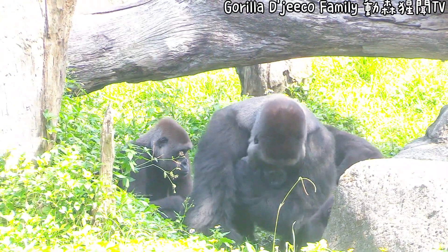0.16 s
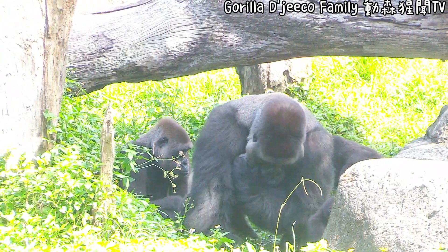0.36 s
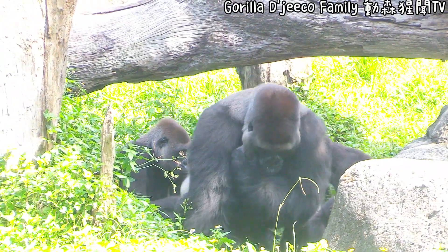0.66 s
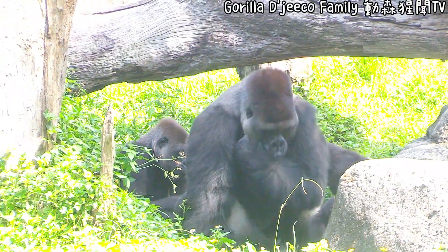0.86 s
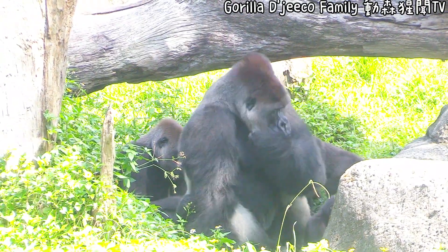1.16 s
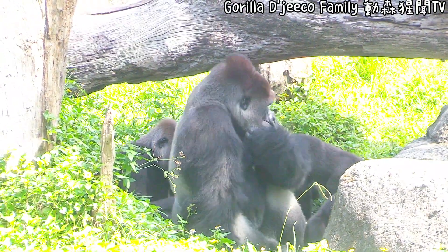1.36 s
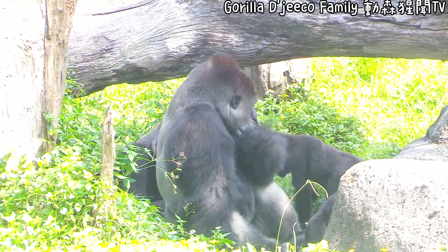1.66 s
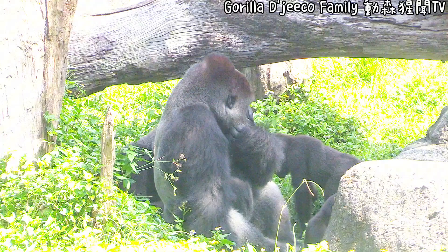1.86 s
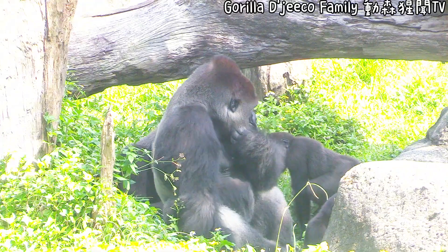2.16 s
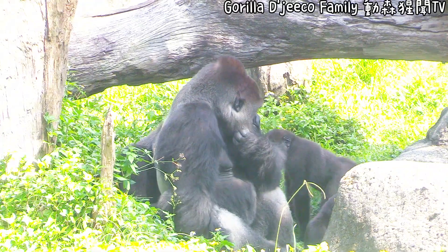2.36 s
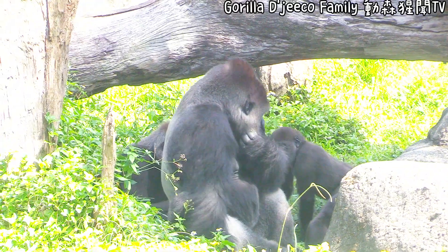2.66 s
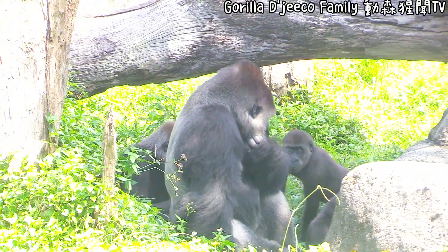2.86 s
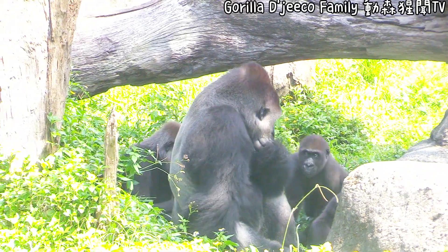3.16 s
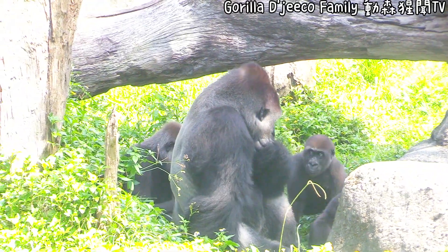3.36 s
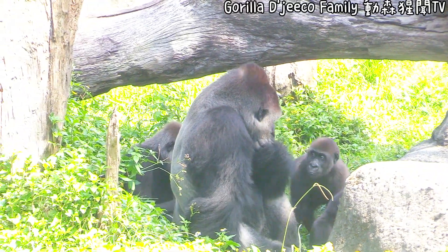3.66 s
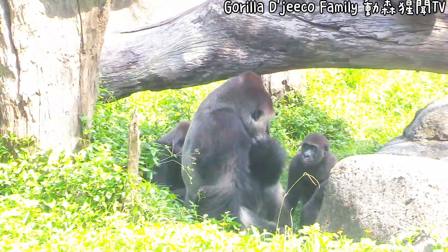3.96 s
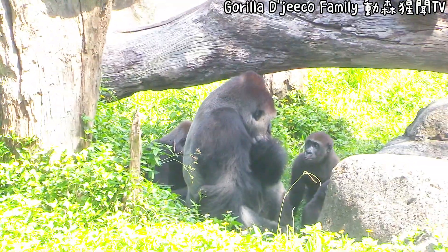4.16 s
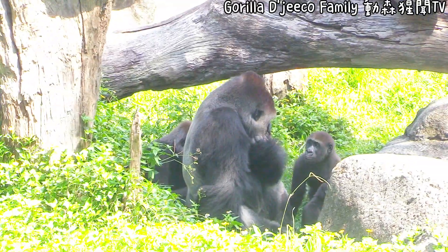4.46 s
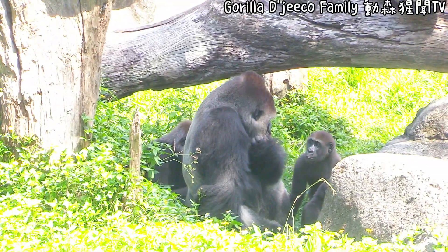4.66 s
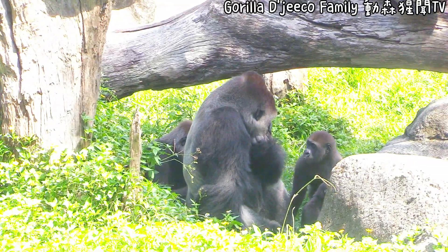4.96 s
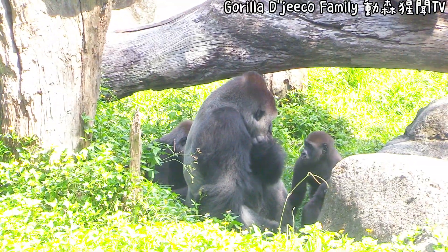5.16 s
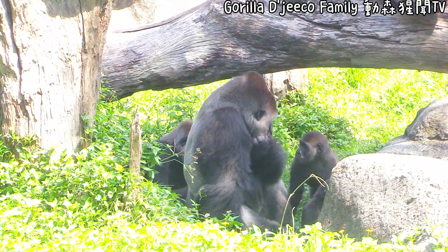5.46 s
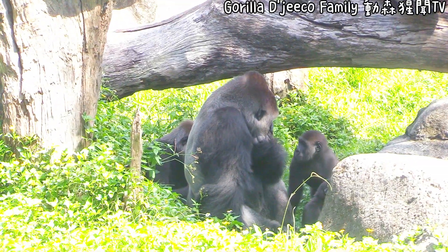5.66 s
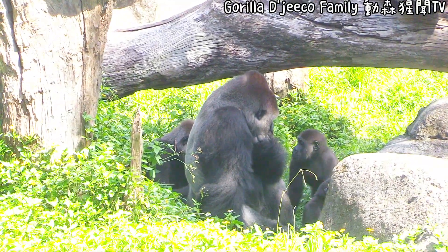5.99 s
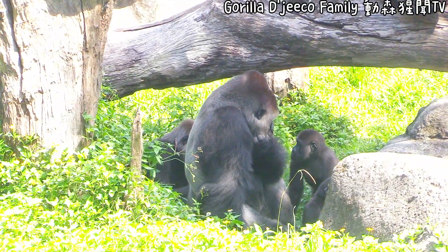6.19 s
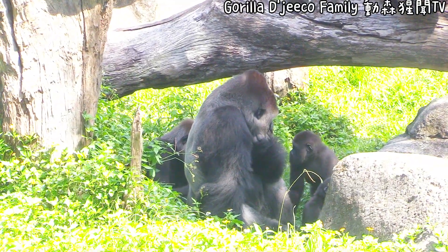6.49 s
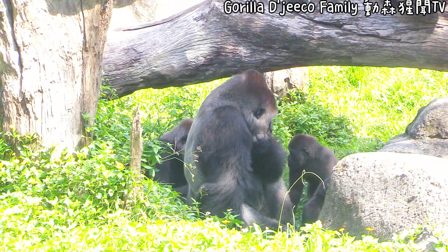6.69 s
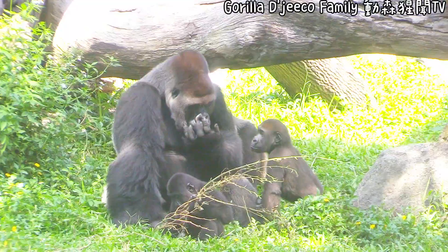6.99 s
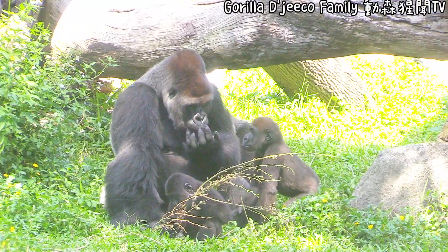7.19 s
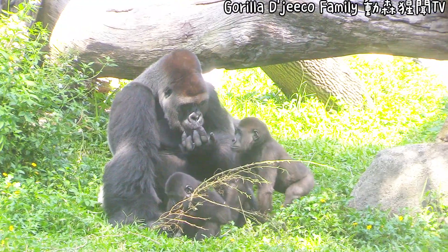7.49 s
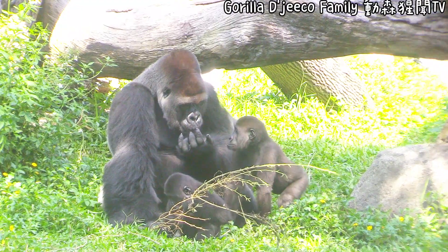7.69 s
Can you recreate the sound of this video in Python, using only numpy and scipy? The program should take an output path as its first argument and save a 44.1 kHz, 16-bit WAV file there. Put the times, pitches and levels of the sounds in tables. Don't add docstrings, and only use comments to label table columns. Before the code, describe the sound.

A low engine drone under a broad outdoor rush, with light handling ticks and two plastic knocks, then a sudden cut to a quieter spot with cicada and bird.

```python
import sys
import numpy as np
from scipy import signal
from scipy.fft import rfft, irfft, next_fast_len
from scipy.io import wavfile
from scipy.ndimage import uniform_filter1d

SR = 44100
rng = np.random.default_rng(int(sys.argv[2]) if len(sys.argv) > 2 else 0)


def volts(x):
    e = np.asarray(x, float) / 20
    return 10 ** e


def generate_wav(signal):
    frames = np.transpose(np.atleast_2d(signal))
    scaled = np.clip(frames, -1, 1) * 32767
    pcm = np.round(scaled).astype(np.int16)
    wavfile.write(sys.argv[1], SR, pcm)


N = 345289
CUT_S = 6.7625


def unit(x):
    return x / np.sqrt(np.mean(x ** 2) + 1e-20)


def along(points, hz):
    point_hz, value = np.transpose(points)
    return np.interp(np.log(hz + 1), np.log(point_hz + 1), value)


def curves(rows):
    time_s, *columns = np.transpose(rows)
    return [np.interp(np.arange(N) / SR, time_s, column) for column in columns]


def wobble(rate):
    points = int(N * rate / SR) + 4
    return np.interp(np.arange(N) * rate / SR, np.arange(points), rng.standard_normal(points))


def filtered(x, response):
    m = next_fast_len(N + 8192)
    return irfft(rfft(x, m) * response(np.fft.rfftfreq(m, 1 / SR)), m)[..., :N]


# pitch_hz, side_minus_mid_db
PORTS = [(60, -20), (95, -7), (150, -19), (240, -14), (380, -5), (600, -2), (950, 1.5), (1500, -2),
         (2380, -9), (3770, 4), (5980, -2.5), (9470, -7.5), (15000, -6)]
# pitch_hz, left_minus_right_db
LEAN = [(300, 0.5), (1000, 1), (3000, 1.3), (10000, 1.3)]


def diffuse(gain, patchy_db):
    cells = signal.stft(rng.standard_normal((2, N)), nperseg=512)[2]
    patches = uniform_filter1d(rng.standard_normal(cells.shape[1:]), 5, 0)
    patches = unit(uniform_filter1d(patches, 12, 1))
    pair = signal.istft(cells * volts(patchy_db * patches), nperseg=512)[1][:, :N]
    mid, side = filtered(pair, lambda hz: gain(hz) * [hz >= 0, volts(along([(30, 1)] + PORTS, hz))])
    ports = np.array([mid + side, mid - side]) / np.std(mid)
    return filtered(ports, lambda hz: volts(np.outer([.5, -.5], along(LEAN, hz))))


# time_s, shift_db
SWAY = [(0, 4), (1.2, 0.3), (2.8, -1.5), (4.2, 0.7), (5.6, -0.3), (6.8, -3.5)]


def engine(orders, unsteady_db, drift, flutter_hz):
    shaft_hz = 28.7391
    shaft = 2 * np.pi * shaft_hz * np.arange(N) / SR - 1.452
    ninth_db, = curves(SWAY)
    build_db = -np.cos(2 * np.pi * np.arange(N) / SR / 7.9)
    sixth_db = build_db - 0.13 * ninth_db
    upper_db = build_db + 0.15 * ninth_db
    out = np.zeros((2, N))
    for order, db, pan_db, lead in orders:
        weak = np.clip((order - 6) / 12, 0, 1)
        path_db = sixth_db if order == 6 else ninth_db if order == 9 else upper_db * weak
        flutter_db = unsteady_db * (0.35 + 1.67 * weak) * wobble(flutter_hz)
        level = np.sqrt(2) * volts(db + drift * path_db + flutter_db)
        phase = order * shaft + np.pi - 1.65 * np.log(order / 3)
        phase += (order > 9) * rng.uniform(0, 2 * np.pi)
        alike = level * np.cos(lead / 2) * np.cos(phase)
        apart = level * np.sin(lead / 2) * np.sin(phase)
        out[0] += volts(pan_db / 2) * (alike - apart)
        out[1] += volts(-pan_db / 2) * (alike + apart)
    return out


def weak_orders(strong):
    firing_order, last_order, knee_order = 1.5, 30, 21
    firing = np.arange(3, last_order / firing_order) * firing_order
    whole = np.setdiff1d(np.arange(13, last_order, 4), firing)
    order = np.setdiff1d(np.union1d(firing, whole), [row[0] for row in strong])
    db = -63.8 - 6.5 * (order > knee_order) - 4 * np.isin(order, whole)
    chance = rng.standard_normal((len(order), 2))
    pan_db, lead_rad = 0.5 * chance[:, 0], 1 * chance[:, 1]
    return list(zip(order, db, pan_db, lead_rad))


# shaft_multiple, level_db (rms), left_minus_right_db, left_lead_rad
ORDERS_NEAR = [(3, -47, 0, 0.1), (5, -50, 2, 0.1), (6, -41, -2, 0.1), (7, -62, 1, 0.3), (9, -45, 0, -0.1),
               (11, -60, -2, 0.3), (12, -61, -4, -1.1), (15, -56, 0, 0.7), (16, -63, 9, 1.1),
               (21, -65, -2, 0.5), (25.5, -65, 8, 1.2), (30, -66, -5, -0.3), (48, -68, 6, -0.3),
               (69, -68, 2, 0.0)]


def near_engine():
    return engine(ORDERS_NEAR + weak_orders(ORDERS_NEAR), 0.86, 0.6, 1.496)


# pitch_hz, level_db (per Hz)
ROAR_NEAR = [(18, -62), (30, -28), (62, -15), (110, -7), (220, -8.5), (480, -10), (620, -12.5), (900, -14),
             (2700, -15.5), (3400, -24), (4400, -28.5), (6400, -26), (9000, -27.5), (13000, -28.5),
             (15800, -36)]
ROAR_FAR = [(18, -54), (30, -26), (70, -15), (130, -7), (447, -7), (600, -13.5), (1150, -15), (1300, -16.5),
            (2700, -17), (3540, -26), (7700, -26.5), (9200, -24.5), (10200, -30.5), (13000, -29.5),
            (15800, -40)]


def roar(spectrum, level_db, patchy_db):
    noise = diffuse(lambda hz: volts(along(spectrum, hz)), patchy_db)
    return volts(level_db + 0.18 * wobble(3.315)) * noise


# pitch_hz, level_db, t60_s (time to fade by 60 dB)
PANELS = [(735, 2, 0.013), (1144, -3.5, 0.027), (1600, 8, 0.007), (2150, 2.5, 0.018), (2420, -1, 0.031),
          (3100, 1.5, 0.017), (3600, 6, 0.012), (4500, -1.5, 0.009), (5400, 6, 0.011), (7300, -3, .01)]
# start_s, peak_db, centre_hz (of panels touched), reach_octaves, lean_left (-1 to 1)
TICKS = [(1.052, -35.5, 2630, 0.53, .1), (1.0532, -43, 5400, .12, 0.01), (1.0966, -43, 3600, .15, 0.01),
         (1.1167, -32, 2900, 0.56, -.5), (1.1180, -36, 1300, .6, -.4), (1.205, -49, 3300, .15, .3),
         (1.8603, -37, 7300, .15, .6), (2.7862, -44, 3100, .15, .4), (4.0350, -37, 1100, .5, -.5),
         (4.0537, -39.5, 1500, 0.54, -.2), (4.0610, -44, 1600, .15, .1), (4.0530, -50, 3500, .12, 0.01),
         (4.3676, -39.5, 2950, 0.26, .6), (5.1491, -29, 1600, 1.2, .4), (5.1494, -31.5, 3660, .3, .4),
         (5.2897, -42, 2100, .12, 0.01), (5.9485, -52, 3600, .12, 0.01), (5.9816, -25.5, 2150, .14, -0.6),
         (5.982, -39, 4300, .12, -.4)]


def ticks():
    out, t = np.zeros((2, N + SR)), np.arange(SR // 30) / SR
    hz, level_db, t60 = np.transpose(PANELS)[:, :, None, None]
    share = np.array([[.35], [.75], [.35]]) * (-1) ** np.arange(len(hz))[:, None, None]
    for s, db, centre_hz, reach, lean in TICKS:
        split = 1 + .06 * np.array([[-1], [0], [1]]) * rng.uniform(.6, 1.4, (len(hz), 3, 1))
        start = rng.normal(0, 1.3, (len(hz), 3, 1))
        turn = np.arccos(np.clip(lean, -1, 1))
        touched_db = db + level_db - 6 * (np.log2(hz / centre_hz) / reach) ** 4
        fade = share * volts(touched_db - 60 * t / t60) * (1 - np.exp(-t / 0.000055))
        phase = 2 * np.pi * hz * split * t + start
        mid = volts(-1.0) * (fade * np.sin(phase)).sum((0, 1))
        side = volts(-3.5) * (fade * np.sin(phase + turn)).sum((0, 1))
        out[:, round(s * SR):][:, :len(t)] += [mid + side, mid - side]
    return out[:, :N]


# start_s, peak_db, t60_s, left_minus_right_db
SNAPS = [(1.0521, -40, .006, 1), (1.1158, -33, .008, -3), (2.7862, -42, .003, 2), (4.3676, -42, .004, 3),
         (5.1490, -25, .0012, 3), (5.9819, -42, .004, -3)]


def snaps():
    out, t = np.zeros((2, N + SR)), np.arange(512) / SR
    for s, db, t60, pan_db in SNAPS:
        common, own = rng.standard_normal(len(t)), rng.standard_normal((2, len(t)))
        common[0] = 5.3
        crack = np.diff((common + 0.16 * own) * volts(-60 * t / t60), prepend=0)
        level = .55 * volts(db + np.array([[pan_db / 2], [-pan_db / 2]]))
        out[:, round(s * SR):][:, :len(t)] += level * crack

    def housing(hz):
        echo = 1 - .9 * np.exp(-2j * np.pi * hz / 4750)
        return echo * (hz > 4300) * 7000 / (hz + 1)
    return filtered(out[:, :N], housing)


# pitch_hz, level_db, t60_s
SHELL = [(721, -27, .06), (940, -19.5, .15), (1244, -22, .07), (1620, -22, .03), (2040, -15, .028),
         (2450, -13, .022), (2900, -13, .022), (3480, -1, .010), (3900, -12, .008), (5100, -21, .008),
         (6300, -22, .008)]
# start_s, peak_db, pitch_factor, deep_db (extra for tones under 3 kHz)
KNOCKS = [
    (1.1434, -13, 1, 0),
    (5.8906, -24.5, .985, 5),
]


def knocks():
    out, t = np.zeros((2, N + SR)), np.arange(SR // 5) / SR
    for s, db, pitch, deep_db in KNOCKS:
        ring = np.zeros((2, len(t)))
        for k, (hz, level_db, t60) in enumerate(SHELL):
            fade = (-1) ** k * volts(level_db + deep_db * (hz < 3000) - 60 * t / t60)
            start = 0.12 * rng.standard_normal((2, 1))
            ring += fade * np.sin(2 * np.pi * hz * pitch * t + start)
        rattle = signal.lfilter([1], [1, -1.3, .6], rng.standard_normal((2, len(t))))
        rattle *= volts(-32.0 - 60 * t / 0.035)
        crack = volts(-19 - 60 * t / 0.007) * rng.standard_normal(len(t))
        onset = 1 - np.exp(-t / .00015)
        out[:, round(s * SR):][:, :len(t)] += volts(db) * (ring + rattle + crack) * onset
    return out[:, :N]


# shaft_multiple, level_db (rms), left_minus_right_db, left_lead_rad
ORDERS_FAR = [(3, -70, 0, .1), (6, -56, -1, .2), (9, -64, -1, .3), (15, -71, 0, .7)]


def far_engine():
    return engine(ORDERS_FAR, 4, 0, 14)


# pitch_hz, width_hz, level_db, pulsing_share (0 to 1), lag_rad (of the stroke)
TYMBAL = [(7000, 550, 0, 1, 0), (6350, 500, -2.5, .5, .8), (5250, 450, -6, .5, 1.7)]


def cicada():
    tires_s, stroke_hz = 7.44, 16.5
    depth = np.where(np.arange(N) / SR < tires_s, .8, .55)
    stroke = 2 * np.pi * stroke_hz * np.arange(N) / SR + 3.25
    out = np.zeros((2, N))
    for hz, width_hz, db, share, lag in TYMBAL:
        swell = 1 + np.clip(depth * share, 0, 1) * np.cos(stroke - lag)
        out += volts(db) * swell * diffuse(lambda f: np.exp(-2 * ((f - hz) / width_hz) ** 2), .5)
    return volts(-66.3) * out


# start_s, pitch_hz (at the start), level_db
NOTES = [(7.2, 2750, -64), (7.297, 2780, -65), (7.385, 2030, -59.5), (7.420, 2300, -62), (7.454, 2680, -52),
         (7.485, 2950, -63)]


def bird():
    note_s, rise_hz_per_s = .045, 6500
    whistle = np.zeros(N)
    for s, from_hz, db in NOTES:
        u = np.linspace(0, 1, round(note_s * SR))
        phase = 2 * np.pi * np.cumsum(from_hz + rise_hz_per_s * note_s * u) / SR
        whistle[round(s * SR):][:len(u)] += 2 * volts(db) * np.sin(phase) * np.sin(np.pi * u) ** 2
    tail = rng.standard_normal((2, SR // 4)) * volts(-60 * np.arange(SR // 4) / SR / 0.17)
    tail /= np.linalg.norm(tail[0])
    whistle *= volts(2.2 * wobble(150))
    return whistle + volts(-6) * signal.fftconvolve(whistle[None], tail, axes=1)[:, :N]


def scene():
    since = np.arange(N) / SR - CUT_S
    first = near_engine() + roar(ROAR_NEAR, -49.5, 0.49)
    first += ticks() + snaps() + knocks()
    second = far_engine() + roar(ROAR_FAR, -49.8, 0.78)
    second += cicada() + bird()
    return np.where(since < 0, first, second * np.clip(since / 0.016, 0, 1))


def top_cut(x):
    return signal.sosfilt(signal.butter(12, 16500, fs=SR, output="sos"), x)


def record(dry):
    top_hz = 15760
    mix = filtered(dry, lambda hz: hz < top_hz)
    return top_cut(mix)


dry = scene()
out = record(dry)
generate_wav(out)
```